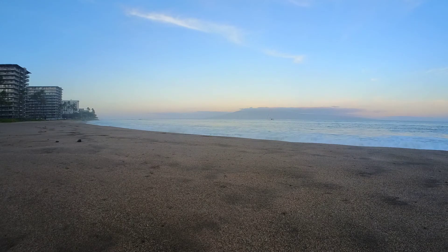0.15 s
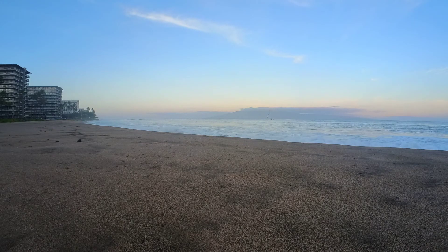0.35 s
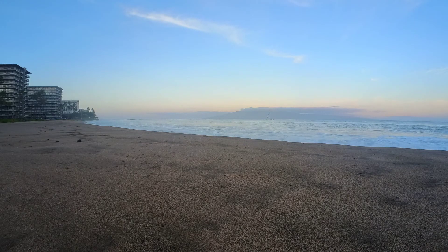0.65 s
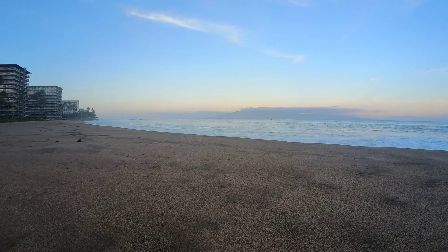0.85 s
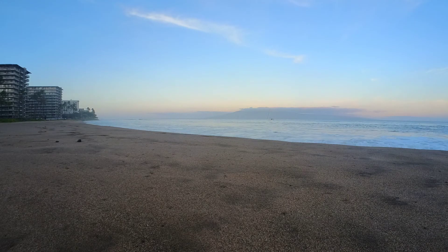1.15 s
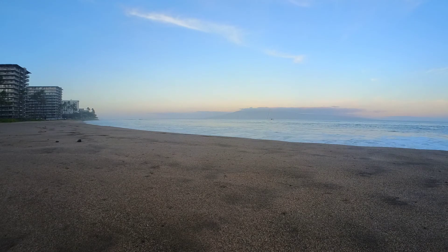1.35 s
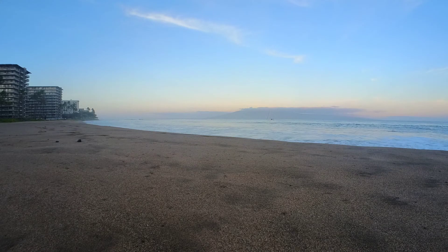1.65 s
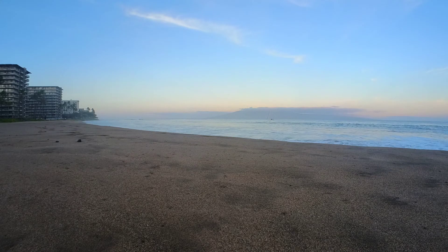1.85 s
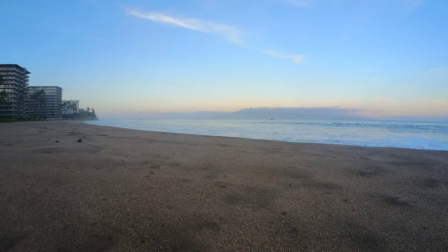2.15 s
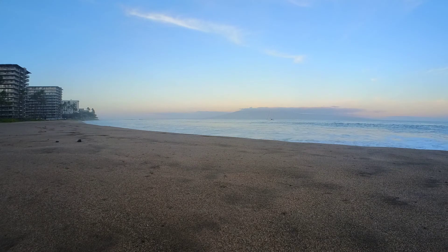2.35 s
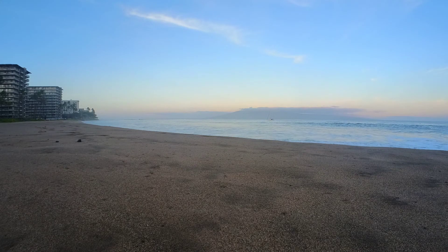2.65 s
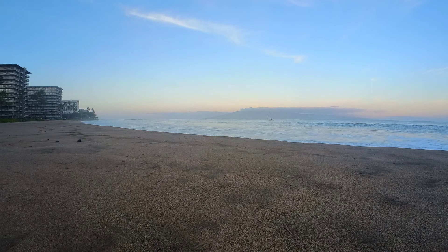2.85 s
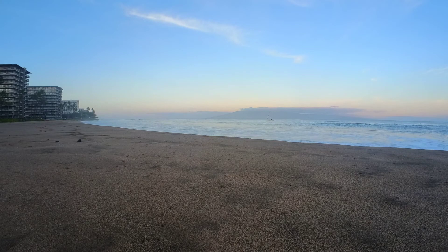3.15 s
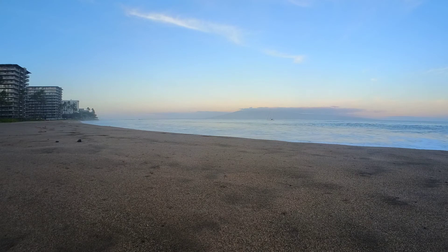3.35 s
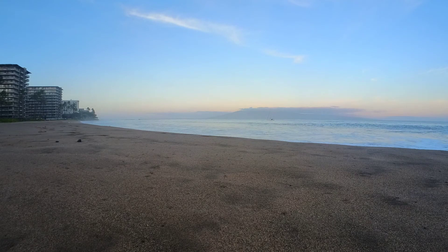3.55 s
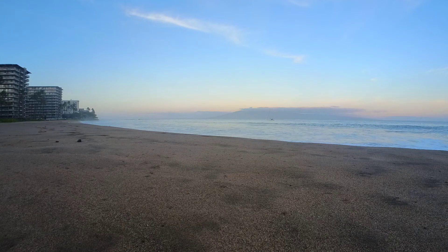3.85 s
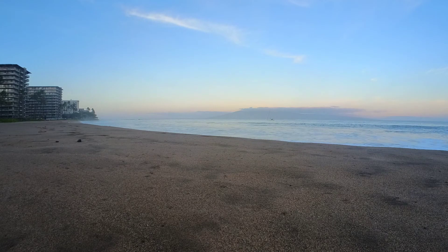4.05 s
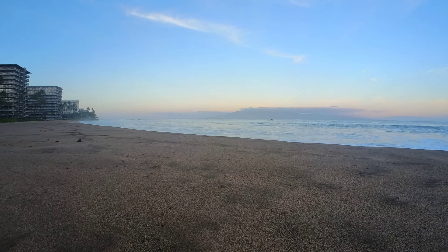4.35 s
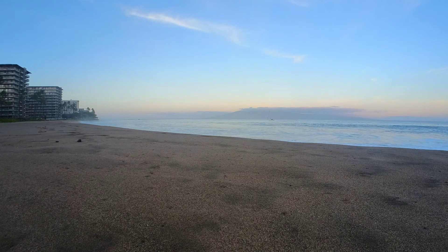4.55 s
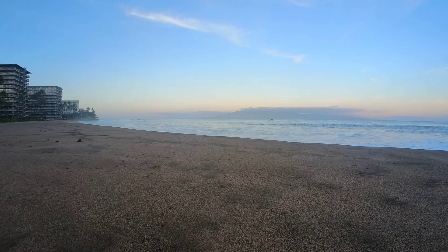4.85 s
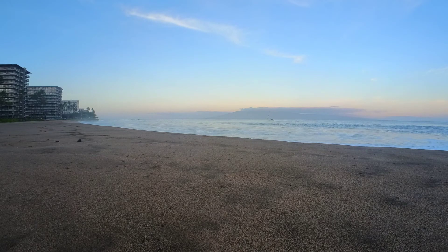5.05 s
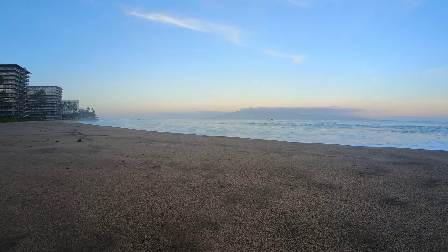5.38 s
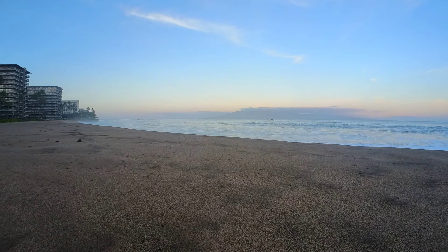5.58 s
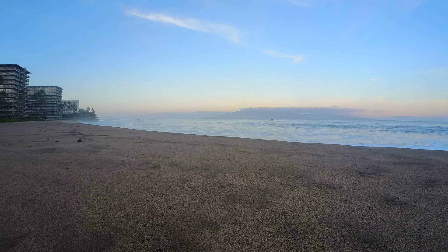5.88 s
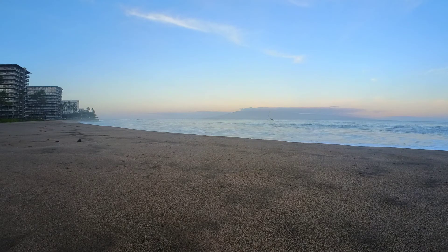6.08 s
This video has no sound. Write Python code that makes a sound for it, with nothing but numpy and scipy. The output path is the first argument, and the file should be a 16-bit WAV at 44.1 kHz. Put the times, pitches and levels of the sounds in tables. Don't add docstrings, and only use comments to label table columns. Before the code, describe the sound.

Beach surf: a strong foamy rush fades fast, then soft distant rumbling swells with small whistled bird calls and thin hiss behind.

```python
import sys
import numpy as np
from scipy import signal
from scipy.fft import rfft, irfft, next_fast_len
from scipy.io import wavfile
from scipy.ndimage import uniform_filter1d, map_coordinates

SR = 44100
rng = np.random.default_rng(int(sys.argv[2]) if len(sys.argv) > 2 else 0)


def invert_db(level):
    return 10 ** (np.asarray(level, dtype=float) / 20)


def master_out(mix):
    frames = np.transpose(np.atleast_2d(mix))
    ceiling = np.clip(frames, -1, 1)
    pcm = np.round(ceiling * 32767).astype(np.int16)
    wavfile.write(sys.argv[1], SR, pcm)


N = 274302


def surf():
    boom_db, roar_db, wash_db, far_wash_db, foam_db = surge()
    thin = np.clip((-50 - foam_db) / 22, 0, 1)
    near = invert_db(boom_db) * boom() + invert_db(roar_db) * roar() + invert_db(wash_db) * wash(thin)
    return near + invert_db(far_wash_db) * far_wash() + invert_db(foam_db) * foam(foam_db, thin) + spray(foam_db)


# time_s, strength_db
BREAKER_FADE = [(0, -40), (.25, -40.5), (.6, -43), (.9, -45), (1.12, -46.5), (1.15, -48), (1.4, -52),
                (1.7, -56.5), (2.0, -57.5), (2.24, -59.5), (2.4, -62), (2.8, -64.5), (3.34, -67.5),
                (3.76, -67), (4.02, -71), (4.3, -71.5), (4.56, -74), (6.22, -78.5)]
# time_s, level_db
FAR_WAVES = [(2.4, -57.5), (3.2, -70), (3.6, -67), (3.88, -64), (4.05, -54), (4.35, -59.5), (4.6, -53),
             (4.92, -57.5), (5.1, -53), (5.4, -57.5), (5.7, -54), (6.22, -50.5)]
# time_s, swell_db
SLUMP_SWELLS = [(.29, 5.5), (.37, -0.5), (.8, 4), (.89, -6), (1.11, -1.5), (1.17, -2.5), (1.45, 3),
                (1.52, 5.5), (1.66, -6), (1.75, 4.5), (2.01, -13), (2.06, 8), (2.21, 10), (2.7, -6),
                (3.22, 7), (3.33, 5), (3.5, 3), (3.7, 0.5), (6.14, -4), (.14, 0), (.73, -2), (1.0, -3),
                (4.02, 10), (4.45, 4), (4.81, 5), (4.97, -1), (5.04, 5), (5.72, 3.5), (.02, -1.5), (.09, 0),
                (.44, 0.5), (.68, 3.5), (2.308, 8), (2.45, 6.5), (4.72, 3), (5.5, 8), (.51, 3), (.85, -1),
                (1.23, -7), (1.28, -6), (1.37, -4), (.77, -4), (1.6, -1), (2.8, 5), (3.56, -4), (4.3, 4),
                (4.51, 1), (4.86, 0), (5.0, -1), (5.19, -6), (5.68, -2), (5.95, -5), (6.09, -5), (6.19, -6)]
# time_s, swell_db
HEAVE_SWELLS = [(.04, -0.5), (.3, 1.5), (.55, -2), (.64, -1.5), (.74, -1), (.9, 1), (1.2, -1), (1.4, 0.5),
                (1.63, 0), (1.85, 1.5), (2.12, 0), (2.3, -1), (2.45, 1.5), (3.3, 0.5), (3.45, 0.5),
                (1.09, 3.5), (1.27, -2), (4.5, 2), (4.75, 0.5), (5.2, 1), (5.6, 0.5), (5.9, -0.5)]
# time_s, swell_db
LAP_SWELLS = [(.5, -1), (.75, 1), (1.05, -2.5), (1.16, -1.5), (1.24, -3), (1.5, 2), (1.6, 0.5), (1.7, 2.5),
              (2.6, 2), (2.72, -1), (2.82, -0.5), (3.0, 2.5), (3.1, 0), (3.25, 1.5), (3.35, 3.5), (3.55, 4),
              (3.65, 1), (3.76, -2), (4.12, 0), (4.44, -2), (4.52, 1.5), (4.6, -7), (4.67, 3), (4.72, 1.5),
              (4.79, -5), (4.86, -1.5), (4.96, 2), (5.08, -3), (5.13, 0), (5.25, -0.5), (5.37, -6),
              (5.43, 2), (5.5, -4), (5.58, 3), (5.65, 0.5), (5.73, 2), (5.8, -1.5), (5.9, -0.5),
              (6.0, -2.5)]


def surge():
    foam_db, = curves(BREAKER_FADE)
    far_db, = curves(FAR_WAVES)
    t = np.arange(N) / SR

    def near(full_db, fade):
        return full_db + fade * (foam_db + 41)

    def far(offset_db, swell):
        return -52 + offset_db + swell * (far_db + 52)

    boom_db = power_sum_db(near(-35.5, 1.12), far(-4.5, 0.073))
    roar_db = power_sum_db(near(-30, 0.95), far(1.03, 0.71))
    next_wave_db = 50 * np.maximum(t - 6.01, 0)
    slump_db = bumps(SLUMP_SWELLS, half_s=0.024)
    heave_db = bumps(HEAVE_SWELLS, half_s=0.057)
    lap_db = bumps(LAP_SWELLS, half_s=0.035)

    boom_db = boom_db + slump_db + 0.26 * heave_db + 0.75 * wobble(11)
    roar_db = roar_db + heave_db + 0.41 * lap_db + 0.22 * slump_db + 0.52 * wobble(11)
    wash_db = near(-40.5, 0.96) + lap_db + 0.17 * wobble(9.6)
    far_wash_db = far(-15, 0.91) + next_wave_db + lap_db + 0.73 * wobble(14)
    foam_db = foam_db + 0.23 * lap_db + 0.14 * wobble(16)
    return boom_db, roar_db, wash_db, far_wash_db, foam_db


# pitch_hz, level_db (per Hz)
BOOM_SPECTRUM = [(25, -47), (45, -31.5), (70, -11), (120, 0), (170, -4), (240, -6.5)]


def boom():
    return coloured(patchy(1.23, 2, 20), BOOM_SPECTRUM)


# pitch_hz, level_db (per Hz)
ROAR_SPECTRUM = [(120, -39), (180, 0), (230, 1.5), (400, -2.5), (700, -8), (900, -12.5), (1200, -25),
                 (1700, -45)]


def roar():
    return coloured(patchy(0.82, 3, 20), ROAR_SPECTRUM)


# pitch_hz, level_db (per Hz)
WASH_SPECTRUM = [(600, -18), (850, -3.5), (1200, -2), (1600, -5.5), (2300, -46)]


def wash(thin):
    water = patchy(0.43 + 4.2 * thin, 4, 14)
    ringing = bubbles(1209, 8.4, 2.4, count=8000)
    return coloured(water + 0.18 * ringing, WASH_SPECTRUM)


# pitch_hz, level_db (per Hz)
FOAM_SPECTRUM = [(1100, -49), (1700, -2), (2500, -5.5), (4000, -9.5), (6000, -10), (6800, -17),
                 (7600, -26.5), (8600, -59)]


def foam(foam_db, thin):
    scraps = np.clip((foam_db + 80.5) / 9, 0.3, 1)
    fizz = patchy(0.5 + 3.8 * thin * scraps, 5, 12)
    bursting = bubbles(3900, 4.5, 0.96, count=11000)
    return coloured(fizz + 0.19 * bursting, FOAM_SPECTRUM)


# pitch_hz, level_db (per Hz)
SPRAY_SPECTRUM = [(5500, -5.5), (6800, -3), (8000, -4.5), (9500, -11.5), (11000, -18), (12500, -22.5),
                  (14000, -29), (15500, -54)]


def spray(foam_db):
    spray_db = -59.5 + 1.18 * (uniform_filter1d(foam_db, SR // 6) + 42.5)
    return suppressed(invert_db(spray_db) * coloured(patchy(1.1, 8, 16), SPRAY_SPECTRUM))


def suppressed(x):
    z = signal.stft(x, nperseg=512, noverlap=384)[2]
    power = uniform_filter1d(np.abs(z) ** 2, size=4, axis=0)
    power = np.abs(uniform_filter1d(power, size=12, axis=1))
    threshold = invert_db(-100) ** 2
    lost = 1 / (1 + (power / threshold) ** 4)
    return signal.istft(z * (1 - 0.71 * lost), nperseg=512, noverlap=384)[1][:N]


# pitch_hz, level_db (per Hz)
FAR_WASH_SPECTRUM = [(600, -10), (850, -1), (1150, -4.5), (1400, -13), (1800, -24), (2300, -40)]


def far_wash():
    return coloured(patchy(3.2, 3, 8, cap=1.2), FAR_WASH_SPECTRUM)


def birds():
    out = glides()
    for s, length, start_hz, end_hz, db, rasp_hz in notes():
        u = np.arange(round(length * SR)) / (length * SR)
        core = note(u, length, start_hz, end_hz, 100 + rasp_hz)
        halo = invert_db(-7) * note(u, length, start_hz, end_hz, 700 + rasp_hz)
        out[round(s * SR):][:len(u)] += invert_db(db) * np.sin(np.pi * u) ** 0.5 * (core + halo)
    out += invert_db(-11) * np.roll(out, round(0.009 * SR))
    tail_t = np.arange(SR // 4) / SR
    echo = rng.standard_normal(SR // 4) * invert_db(-60 * tail_t / 0.12)
    echo = echo / np.linalg.norm(echo)
    return out[:N] + invert_db(-4) * signal.fftconvolve(out, echo)[:N]


# time_s, pitch_hz, level_db
BENDING_CALLS = [
    [(3.747, 3000, -75), (3.753, 2745, -58), (3.764, 2674, -54), (3.774, 2780, -57), (3.784, 2980, -60),
     (3.794, 3000, -72)],
    [(3.606, 4800, -76), (3.615, 4720, -67), (3.625, 4550, -61), (3.633, 4300, -71), (3.642, 3950, -62),
     (3.65, 3680, -64), (3.657, 3500, -78)],
]


def glides():
    out = np.zeros(N + SR)
    for rows in BENDING_CALLS:
        s, hz, db = np.transpose(rows)
        t = s[0] + np.arange(round((s[-1] - s[0]) * SR)) / SR
        phase = 2 * np.pi * np.cumsum(np.interp(t, s, hz)) / SR
        tone = np.sqrt(2) * np.sin(phase)
        out[round(s[0] * SR):][:len(t)] += invert_db(np.interp(t, s, db)) * tone
    return out


# start_s, length_s, start_hz, end_hz, level_db
WHISTLE_CALLS = [ (2.64, 0.03, 2800, 3000, -69), (2.668, 0.03, 3000, 3080, -68),
                 (2.805, 0.031, 5600, 4970, -70), (3.046, 0.035, 4670, 4500, -67),
                 (3.29, 0.022, 3430, 3610, -64.5), (3.36, 0.039, 2000, 1835, -67.5),
                 (3.376, 0.017, 1500, 1600, -65), (3.551, 0.015, 2700, 2650, -64.5),
                 (3.647, 0.023, 2050, 1950, -70.5), (3.702, .012, 2780, 2650, -64),
                 (3.682, .012, 3900, 3650, -67), (3.66, 0.019, 3000, 3050, -78),
                 (3.796, 0.026, 2880, 3060, -66), (4.003, .03, 3600, 3800, -78),
                 (4.085, .02, 3400, 3400, -79), (4.108, .022, 2600, 2700, -77), (4.2, .02, 3500, 3350, -77),
                 (4.245, .04, 4000, 4050, -78), (4.35, .03, 3000, 3150, -76),
                 (3.278, .012, 3100, 3050, -71), (3.342, .01, 2780, 2720, -70),
                 (2.63, .018, 3700, 3700, -71), (3.802, 0.01, 5000, 5040, -74),
                 (4.132, 0.01, 3180, 3100, -72), (4.18, 0.028, 2950, 2500, -68),
                 (4.21, .018, 2600, 2100, -71), (4.288, 0.028, 3050, 2760, -72),
                 (4.408, .016, 3430, 3310, -68), (4.43, 0.018, 3120, 3200, -71),
                 (4.488, .012, 2750, 2750, -74), (5.36, 0.02, 3400, 3300, -78),
                 (5.385, .022, 3450, 3580, -77), (5.37, 0.029, 4370, 4370, -80),
                 (5.56, 0.021, 3780, 3650, -76), (6.155, .027, 3560, 3620, -78.5)]
# start_s, length_s, start_hz, level_db
RASP_CALLS = [ (2.7, 0.13, 4300, -71), (2.62, 0.22, 2900, -74), (3.12, 0.11, 4200, -76),
              (3.14, 0.075, 2980, -89), (2.7, 0.053, 2550, -70), (4.015, 0.04, 2100, -73),
              (3.53, 0.081, 2300, -74), (4.6, 0.041, 1900, -75), (3.3, 0.082, 3800, -88),
              (3.33, 0.058, 2900, -80), (3.64, 0.062, 5200, -71.5), (3.5, 0.057, 2870, -69.5),
              (3.9, .12, 6000, -91), (3.943, 0.05, 2800, -69.5), (3.968, .048, 2550, -68.5),
              (4.01, 0.049, 2700, -74), (4.1, .17, 6100, -92), (4.16, 0.082, 3800, -79),
              (4.24, 0.047, 2800, -72), (4.24, 0.18, 5800, -78), (4.34, 0.081, 3250, -77),
              (4.369, 0.067, 1540, -72), (4.17, .06, 2100, -75), (4.35, .04, 2200, -73),
              (3.71, 0.044, 3600, -73), (3.66, 0.039, 4800, -72), (2.5, .02, 2200, -70),
              (2.87, 0.031, 2300, -73), (4.03, .05, 1700, -72), (4.42, 0.07, 3200, -81),
              (4.16, .05, 2500, -75), (3.4, 0.044, 2200, -73), (2.86, .03, 2900, -74),
              (3.63, 0.033, 2200, -73), (4.53, .04, 6800, -81), (4.75, 0.056, 3300, -79),
              (5.27, .057, 5600, -82), (5.71, 0.12, 6000, -82), (5.87, 0.044, 5400, -83),
              (5.96, 0.12, 6300, -87), (4.34, 0.049, 2300, -76), (4.29, 0.041, 7400, -82),
              (3.35, 0.057, 2400, -73), (4.86, .04, 3700, -84), (5.65, 0.04, 3900, -83),
              (4.84, .06, 6300, -84)]
# warble_s, warble_db, plunge_s, plunge_db, top_hz, bottom_hz
SONG_CALLS = [
    (2.133, -60, 2.207, -62, 4430, 2700),
    (2.752, -61.5, 2.827, -59.5, 5240, 1950),
    (3.598, -64, 3.676, -68, 4610, 1790),
    (4.24, -64.5, 4.308, -61, 5400, 1800),
]


def notes():
    rows = [(*row, 40) for row in WHISTLE_CALLS]
    for s, length, hz, db in RASP_CALLS:
        rows.append((s, length, hz, hz * 0.85, db + 1, hz * 0.16))
    stroke_s, low_hz, rise = 0.034, 2860, 1.1
    high_hz, half_hz = low_hz * rise, low_hz * rise ** 0.6
    for s, warble_db, plunge_s, plunge_db, top_hz, bottom_hz in SONG_CALLS:
        plunge_length_s = np.log2(top_hz / bottom_hz) / 26
        rows += [(s, stroke_s, low_hz, high_hz, warble_db - 1, 180),
                 (s + 0.69 * stroke_s, stroke_s, high_hz, half_hz, warble_db, 180),
                 (plunge_s, plunge_length_s, top_hz, bottom_hz, plunge_db, 300)]
    return rows


def note(u, length, start_hz, end_hz, rasp_hz):
    a, b = (map_coordinates(k, [u * length * rasp_hz]) for k in rng.standard_normal((2, 256)))
    steady = np.clip(200 / rasp_hz, 0, 1.6)
    flutter = steady + 0.6 * (a + 1j * b)
    phase = 2 * np.pi * np.cumsum(start_hz * (end_hz / start_hz) ** u) / SR
    return unit((flutter * np.exp(1j * phase)).real)


# pitch_hz, level_db (per Hz)
TWITTER_SPECTRUM = [(3000, -32), (4300, -23), (5200, 6), (5900, 6.5), (6500, 3.5), (7300, -15)]
# time_s, level_db
FLOCK_FADE = [
    (2.1, -66),
    (2.44, -85),
    (3.0, -77),
    (3.71, -73.5),
    (3.93, -78),
    (5.39, -81.5),
    (6.22, -86),
]


def flock():
    return invert_db(curves(FLOCK_FADE)[0]) * coloured(patchy(6, 2, 7, cap=3.5), TWITTER_SPECTRUM)


# pitch_hz, level_db (per Hz)
HISS_SPECTRUM = [(900, -34), (1500, -4.5), (3000, 1), (6000, -8.5), (8000, -9), (12000, -19.5),
                 (14000, -31), (16000, -70)]


def circuit_hiss():
    return invert_db(-80) * coloured(rng.standard_normal(N), HISS_SPECTRUM)


def bubbles(hz, cycles, spread_db, count):
    draw, t = rng.random((count, 3)), np.arange(400) / SR
    pitch = hz * np.exp(1.202 * (draw[:, 1:2] - 0.5))
    size = invert_db(-spread_db * np.log(1 - draw[:, 2:]))
    age = t * pitch / cycles
    ring = np.sin(2 * np.pi * pitch * t * (1 + 0.11 * age))
    grain = size * age * np.exp(-3 * age) * ring
    at = (draw[:, :1] * N).astype(int) + np.arange(len(t))
    return unit(np.bincount(at.ravel(), grain.ravel())[:N])


def patchy(depth_db, wide, long, cap=1.85):
    z = signal.stft(rng.standard_normal(N), nperseg=512, noverlap=384)[2]
    field = rng.standard_normal(z.shape)
    for _ in range(2):
        field = uniform_filter1d(uniform_filter1d(field, wide, 0), long, 1)
    depth_db = np.interp(np.arange(z.shape[1]) * 128, np.arange(N), depth_db + np.zeros(N))
    level_db = depth_db * np.minimum(unit(field), cap)
    gain = invert_db(level_db - depth_db ** 2 * np.log(10) / 20)
    return signal.istft(z * gain, nperseg=512, noverlap=384)[1][:N]


def coloured(x, spectrum):
    m = next_fast_len(N + 8192)
    f, db = np.transpose(spectrum)
    log_hz = np.log(np.fft.rfftfreq(m, 1 / SR) + 1)
    gain = invert_db(np.interp(log_hz, np.log(f), db, left=-120, right=-120))
    return unit(irfft(rfft(x, m) * gain, m)[:N])


def bumps(rows, half_s):
    t = np.arange(0, N + 64, 64) / SR
    total_db = sum(db * np.exp(-((t - s) / half_s) ** 2) for s, db in rows)
    return np.interp(np.arange(N) / SR, t, total_db)


def wobble(rate):
    return map_coordinates(rng.standard_normal(int(N * rate / SR) + 4), [np.arange(N) * rate / SR])


def curves(rows):
    s, *cols = np.transpose(rows)
    return [np.interp(np.arange(N) / SR, s, c) for c in cols]


def power_sum_db(a_db, b_db):
    return 10 * np.log10(invert_db(a_db) ** 2 + invert_db(b_db) ** 2)


def unit(x):
    return x / np.sqrt(np.mean(x ** 2) + 1e-20)


def scene():
    return (surf() + birds() + flock())[None]


def low_pass(x):
    return signal.sosfilt(signal.butter(12, 15400, fs=SR, output="sos"), x)


def record(dry):
    mix = dry + circuit_hiss()
    return low_pass(mix)


dry = scene()
out = record(dry)
master_out(out)
```